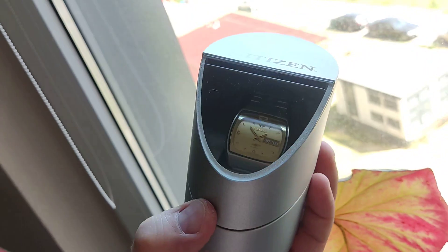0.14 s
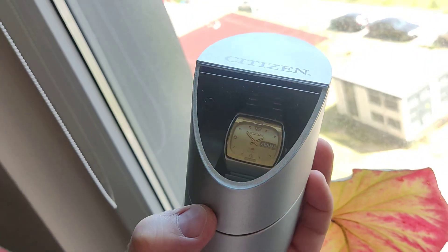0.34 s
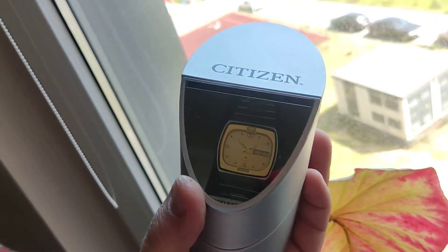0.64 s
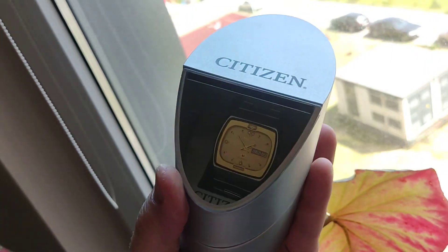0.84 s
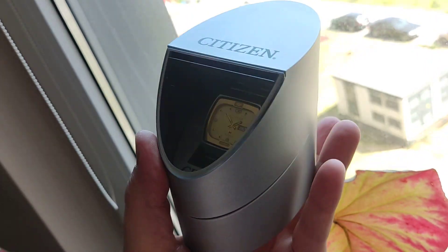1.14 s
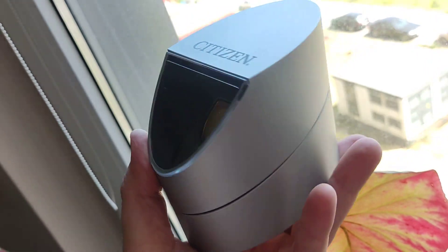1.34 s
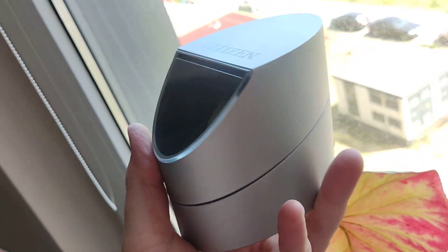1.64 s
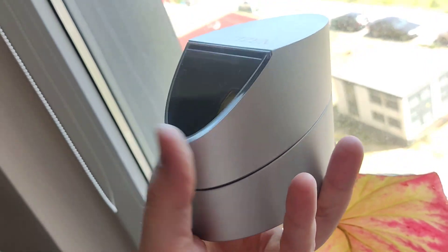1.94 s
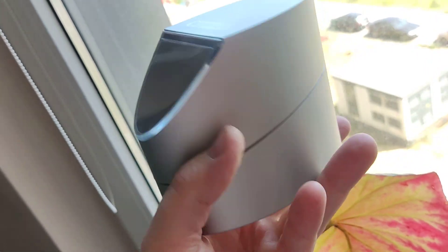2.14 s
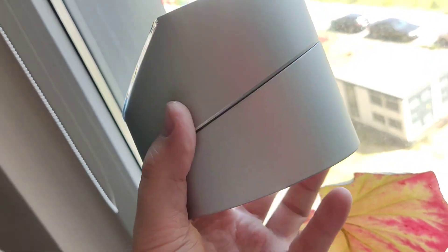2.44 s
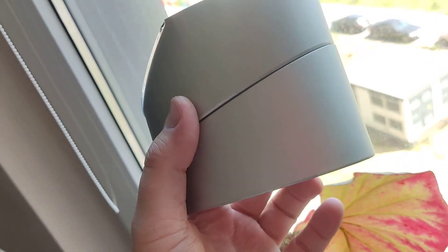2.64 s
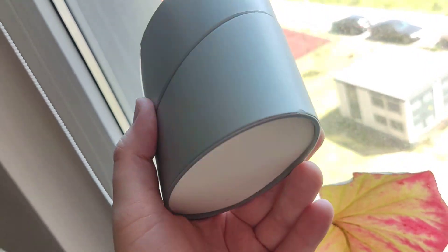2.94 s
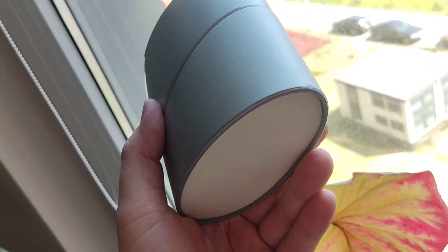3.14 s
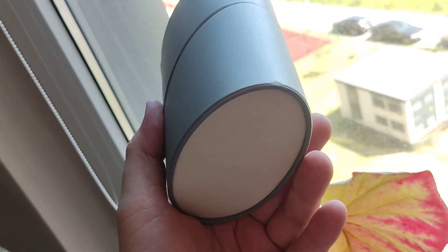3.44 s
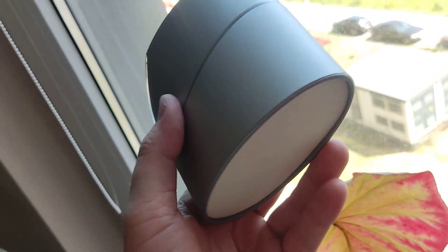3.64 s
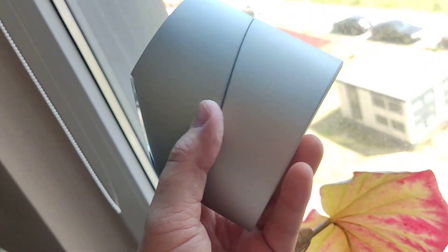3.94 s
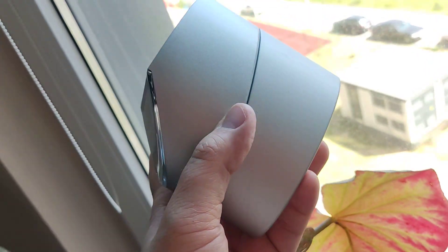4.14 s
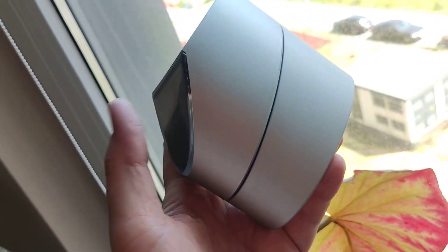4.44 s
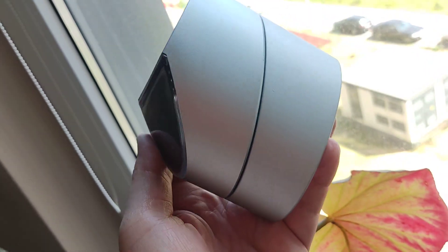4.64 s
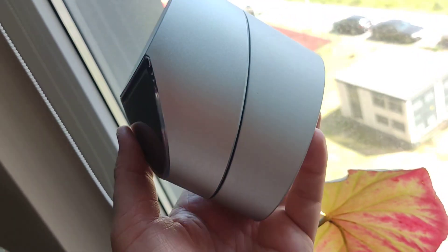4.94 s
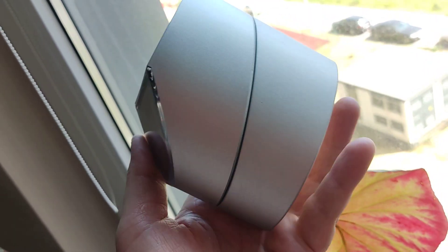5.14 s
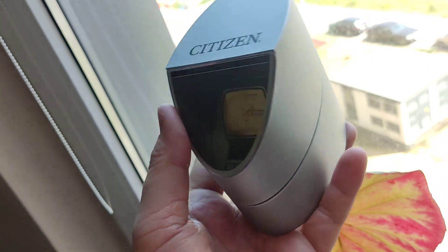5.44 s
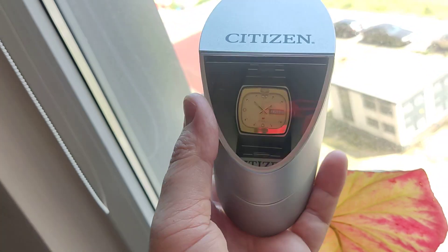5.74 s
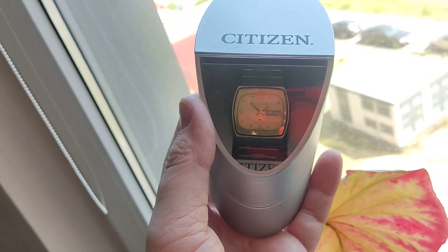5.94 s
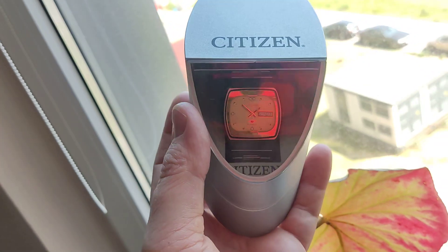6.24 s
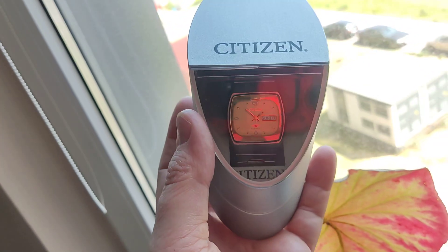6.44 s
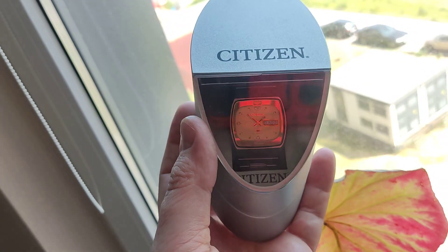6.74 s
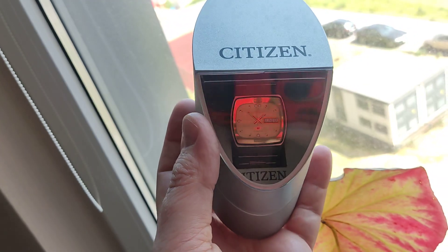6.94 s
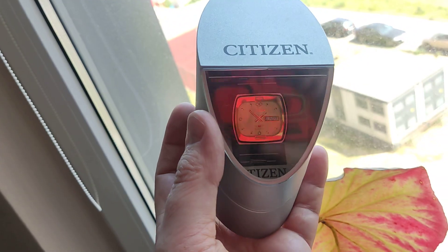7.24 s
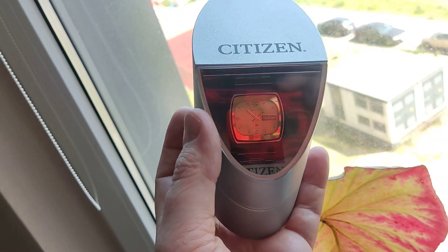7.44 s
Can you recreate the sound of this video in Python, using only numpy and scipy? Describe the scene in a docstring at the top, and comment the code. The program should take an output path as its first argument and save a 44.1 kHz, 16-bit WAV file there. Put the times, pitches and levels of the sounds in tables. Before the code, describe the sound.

Crisp, quick clockwork ticking in a quiet room, short dry finger scuffs on metal, a loud click near 2.7 seconds, and a final low thump.

```python
"""A hand turns a metal watch box by a window: fingertips slide over its matt wall, strokes of grainy noise,
and runs of stick and slip snap on the wall and in the lid's seam, one of them clearly the loudest.
A clockwork escapement, slightly out of beat, strikes ringing modes about three times a second in a small room.
Dull knocks and low bumps near the box are filtered noise; mains hum, a quiet rumble and hiss lie underneath.
Two microphone ports, a hand apart, each ring in the treble."""
import sys
import numpy as np
from scipy import signal
from scipy.fft import rfft, irfft, next_fast_len
from scipy.io import wavfile
from scipy.ndimage import map_coordinates

SR = 44100
rng = np.random.default_rng(int(sys.argv[2]) if len(sys.argv) > 2 else 0)


def wav_record(signal):
    """Record a signal, one row per channel, as 16-bit PCM in the file named by sys.argv[1]."""
    frames = np.transpose(np.atleast_2d(signal))
    bounded = np.clip(frames, -1, 1)
    # unit amplitude maps onto the largest positive 16-bit level
    quanta = np.round(bounded * 32767).astype(np.int16)
    wavfile.write(sys.argv[1], SR, quanta)


N = 334713

# All levels below hold ahead of the microphone; pan_db is left over right.
# Room air and microphone hiss, gain on white noise: pitch_hz, level_db, pan_db
AIR_COLOUR = [(12, -22, 2.5), (30.4, -34, -13.5), (68, -40.5, -11), (157, -40.5, 7), (221, -49.5, -17),
              (246, -42, 6), (327, -48, -5), (456, -52, -3), (1080, -55.5, 1.5), (1615, -51.5, 5.5),
              (3280, -60, 0.5), (4960, -64.5, 0), (8600, -63.5, 1.5), (14400, -69, 0)]
# Left-right likeness of the room air: pitch_hz, likeness (0-1, clipped)
AIR_LIKENESS = [(30, 0.19), (200, 1), (450, 0.49), (900, 0.14), (3000, 0)]
# Mains hum: harmonic (multiple of MAINS_HZ), level_db, pan_db
HUM_HARMONICS = [(1, -60, 4.5), (2, -52.5, 1), (3, -71.5, -5), (4, -70, 9), (5, -66.5, 2.5),
                 (6, -68.5, -1.5), (7, -74, 8.5), (8, -75.5, -5), (9, -93.5, 31), (12, -78, 9),
                 (28, -80, 10), (33, -85, 2)]
MAINS_HZ = 50

# Colour of friction on the metal wall, gain on white noise: pitch_hz, level_db, pan_db
WALL_COLOUR = [(400, -14.5, -9), (920, -16, 9), (1670, -7.5, 3.5), (2720, -6, 11), (3300, -8.5, 5),
               (4180, -6, 7), (5240, -9, 0.5), (7400, -2.5, 3), (9230, 2, 9.5), (10560, 0.5, 11),
               (12860, -3, 7), (15200, -15.5, 8)]
# Faint creep of the gripping fingers, before wall colour and unevenness: time_s, level_db
CREEP_LEVEL = [(0, -70), (1.2, -70.5), (2.4, -67), (3.4, -68), (4.8, -73), (5.9, -78), (7.5, -80)]
CREEP_PRESSURE_DB, CREEP_UNEVEN_DB, CREEP_CHANGES_PER_S = 7.5, 7, 9.6
# Finger strokes, level before wall colour: start_s, length_s, level_db, pressure_db (extra low body)
FINGER_STROKES = [(0.112, 0.018, -48, 3), (0.354, .015, -56.5, 11), (0.472, 0.042, -40, 1.5),
                  (0.623, 0.05, -41.5, -0.5), (.78, 0.0075, -44.5, 2), (0.845, 0.064, -54, 3.5),
                  (1.057, .22, -56, 7), (1.575, 0.0066, -48, 4), (1.937, 0.011, -50, 1),
                  (2.112, 0.032, -53, 2.5), (2.3, 0.087, -49, 8.5), (2.507, 0.029, -47.5, -1),
                  (2.685, .04, -43.5, 1), (2.776, 0.11, -47, 3.5), (3.099, 0.019, -42.5, 2.5),
                  (3.738, 0.067, -44.5, 2.5), (3.932, 0.056, -55, 7.5), (4.083, 0.073, -46.5, 5),
                  (4.217, 0.078, -46.5, 6), (4.582, 0.046, -52.5, 4), (4.987, .13, -51.5, 9),
                  (5.49, 0.083, -63.5, 11), (6.463, .15, -65, 10.5)]
# Fades of a stroke of typical length, longer ones fade more slowly; the finger speeds up on its way
STROKE_TYPICAL_S, STROKE_ATTACK_S, STROKE_RELEASE_S, STROKE_SWELL_DB = 0.039, 0.022, 0.027, 1.5

# Clockwork resonances, excited differently by the two pallets; levels are energy spread over 30 ms,
# before the change with distance: pitch_hz, width_hz, tick_db, tock_db, pan_db
CLOCK_MODES = [(850, 340, -64, -66, 0.5), (1706, 154, -57, -61, 8.5), (1962, 82, -57, -61.5, 9),
               (2372, 57, -62, -62.5, 0), (2385, 100, -62, -61.5, 15.5), (2575, 58, -79, -64.5, 17.5),
               (4030, 180, -65.5, -64, 6.5), (4840, 76, -65, -70.5, 4), (5610, 210, -67, -63.5, 3.5),
               (7800, 770, -68.5, -60.5, 17), (8220, 870, -105, -61.5, 1), (9500, 4800, -61, -64.5, 6)]
# Slow change in loudness of the beats as their distance to the microphones changes: time_s, level_db
BEAT_LEVEL = [(0, 1), (2.5, 0.6), (4.1, -2), (4.8, 0.5), (7.5, -1)]
STEEL_HZ = 2282
# The tock's lag behind its tick slowly grows
FIRST_TICK_S, TICK_PERIOD_S, TOCK_LAG_S, LAG_GROWTH_S_PER_TICK = .0838, .64367, .2705, .00079

# Snaps of the lid in its seam and of skin on the wall, before wall colour: start_s, level_db, build_s
WALL_SNAPS = [(.3405, -50, .004), (1.0761, -36, 0.00039), (1.56, -43.5, 0.0058), (1.7358, -38.5, .005),
              (2.035, -51, 0.0017), (2.226, -46.5, 0.012), (2.65, -31, 0.013), (2.797, -51, .006),
              (3.091, -42, .002)]
# A snap grows to its peak and dies in a time proportional to its build-up
SNAP_GROWTH_DB, SNAP_DECAY_PER_BUILD, SLIP_GAP_S, SLIP_DECAY_S = 2.5, 1.67, .0021, 0.0018
# Soft dull knocks and low bumps near the box, one a longer rumble, one the lid's thud:
# start_s, pitch_hz, level_db (over one decay_s), decay_s
DULL_KNOCKS = [(0.928, 158, -60.5, 0.16), (1.385, 885, -64, 0.045), (2.29, 706, -63.5, 0.09),
               (2.6503, 686, -49.5, 0.0027), (2.956, 1140, -62.5, 0.028), (6.685, 1140, -64.5, .03),
               (6.885, 910, -64, 0.019), (7.4817, 298, -53.5, 0.0048), (7.484, 182, -44, 0.009)]
# A knock's width: a share of its pitch, and more the shorter it is (Hz times s)
KNOCK_WIDTH_SHARE, KNOCK_WIDTH_HZ_S = 0.2, 0.76

# Microphone ports, left then right: pitch_hz, width_hz, peak_db
MICROPHONE_PORTS = [(10040, 990, 8), (8540, 1170, 11.5)]
CUTOFF_HZ = 14350


def from_db(db):
    """Decibels to gain."""
    return 10 ** (np.asarray(db) / 20)


def rms_one(x):
    """Each channel scaled to rms 1."""
    return x / np.sqrt(np.mean(x ** 2, axis=-1, keepdims=True) + 1e-20)


def panned(pan_db):
    """Left and right gains for a level difference."""
    return from_db(np.array([[.5], [-.5]]) * pan_db)


def on_bins(table):
    """The columns of a spectrum table at every FFT bin, joined on a log axis."""
    hz, *columns = np.transpose(table)
    bins = np.log(np.maximum(np.fft.rfftfreq(next_fast_len(N), 1 / SR), 1))
    return [np.interp(bins, np.log(hz), column) for column in columns]


def resonate(x, hz, width_hz):
    """A two-pole resonance with gain 1 on top."""
    r = np.exp(-np.pi * width_hz / SR)
    top = np.array([1, 0, -1]) * (1 - r * r) / 2
    return signal.lfilter(top, [1, -2 * r * np.cos(2 * np.pi * hz / SR), r * r], x)


def flutter(per_s):
    """Random drift about 0: so many new normal values a second, joined by straight lines."""
    at = np.arange(N) / SR * per_s
    return np.interp(at, np.arange(N // 10), rng.standard_normal(N // 10))


def stereo_noise(colour, likeness, lag_s):
    """Coloured noise: a shared part that reaches the right port later, plus each port's own part."""
    level_db, pan_db = on_bins(colour)
    size = next_fast_len(N)
    shared, *own = rfft(rng.standard_normal((3, size)))
    port_lag_s = lag_s * np.array([[0], [1]])
    delay = np.exp(-2j * np.pi * np.fft.rfftfreq(size, 1 / SR) * port_lag_s)
    alike = np.clip(likeness, 0, 1)
    both = np.sqrt(alike) * shared * delay + np.sqrt(1 - alike) * np.array(own)
    return irfft(both * from_db(level_db) * panned(pan_db), size)[:, :N]


def room_air():
    """Rumble and hiss as steady noise, whose likeness at the two ports depends on pitch."""
    return stereo_noise(AIR_COLOUR, on_bins(AIR_LIKENESS)[0], lag_s=0)


def hum():
    """Steady harmonics of the mains from an appliance in the room."""
    turn = 2 * np.pi * MAINS_HZ * np.arange(N) / SR
    out = np.zeros((2, N))
    for harmonic, level_db, pan_db in HUM_HARMONICS:
        sine = np.sqrt(2) * np.sin(round(harmonic) * turn + 2 * np.pi * rng.random())   # rms 1
        out += from_db(level_db) * panned(pan_db) * sine
    return out


def rubbing(grain_db=2.5, grains_per_s=2200, judder_db=2.23, judders_per_s=110, body_hz=6500, likeness=0.41):
    """Skin catches on the matt metal in tiny grains; strokes swell and fade, and pressure brings out the body."""
    t = np.arange(N)[::20] / SR   # coarse steps are enough for power
    uneven_db = CREEP_UNEVEN_DB * flutter(CREEP_CHANGES_PER_S)[::20]
    light = from_db(np.interp(t, *np.transpose(CREEP_LEVEL)) + uneven_db) ** 2
    pressed = light * from_db(CREEP_PRESSURE_DB) ** 2
    for start_s, length_s, level_db, pressure_db in FINGER_STROKES:
        power = (from_db(level_db) * stroke_envelope(t - start_s, length_s)) ** 2
        light += power
        pressed += power * from_db(pressure_db) ** 2
    light, pressed = [np.interp(np.arange(N) / SR, t, power) for power in (light, pressed)]
    roughness_db = grain_db * flutter(grains_per_s) + judder_db * flutter(judders_per_s)
    grain = rms_one(catches() * from_db(roughness_db))
    friction = stereo_noise(WALL_COLOUR, likeness, lag_s=0.000494) * grain   # the box is nearer the left port
    body = signal.sosfiltfilt(signal.butter(3, body_hz, fs=SR, output="sos"), friction)
    return body * np.sqrt(pressed) + (friction - body) * np.sqrt(light)


def stroke_envelope(t, length_s, steepness=1.3):
    """Attack, a hold that swells a little, release; t counts from the start of the hold."""
    slowness = np.sqrt(length_s / STROKE_TYPICAL_S)
    outside = np.maximum(-t, 0) / STROKE_ATTACK_S + np.maximum(t - length_s, 0) / STROKE_RELEASE_S
    swell = from_db(STROKE_SWELL_DB * (np.clip(t / length_s, 0, 1) - .5))
    return swell * np.exp(-np.minimum((outside / slowness) ** steepness, 20))


def catches(per_s=70, catch_db=0.0, decay_s=0.00074):
    """Now and then a ridge of the skin sticks and lets go: a brief surge of the friction."""
    slips = (rng.random(N) < per_s / SR) * rng.random(N)
    surge = signal.lfilter([1], [1, -np.exp(-1 / (decay_s * SR))], slips + 1e-18)
    return 1 + from_db(catch_db) * surge


def near_echoes(x, echo_db, sway_s=.00003, count=5):
    """Window, sill and hand return the sound within milliseconds; the ripple they cut shifts as the box moves."""
    out, size = x.copy(), 4
    for side in range(2):
        fine = signal.resample_poly(x[side], size, 1)   # finer steps keep the echoes bright
        for delay_s in rng.uniform(.0015, .007, count):
            read = size * (np.arange(N) - SR * (delay_s + sway_s * flutter(3.6)))
            out[side] += from_db(echo_db) * map_coordinates(fine, [read], order=1)
    return out / np.sqrt(1 + count * from_db(echo_db) ** 2)


def escapement(change=1.0, skirt=0.63):
    """Each beat rings the same modes by noise that is part shared by all beats, part its own, as room paths."""
    t = np.arange(SR // 4) / SR
    times = beat_times()
    own_paths = rng.standard_normal((len(times), 2, len(t)))
    paths = rng.standard_normal((2, len(t))) + change * own_paths
    is_tock = np.arange(len(times))[:, None, None] % 2
    spread = np.sqrt(.03 / t[-1])   # energy over 30 ms
    beats = strike(t, paths)
    for hz, width_hz, tick_db, tock_db, pan_db in CLOCK_MODES:
        mode = resonate(paths * beat_envelope(t, hz), hz, width_hz)
        ring = resonate(mode, hz, min(skirt * width_hz + 500, SR / 4))
        level = from_db(np.where(is_tock, tock_db, tick_db))
        beats = beats + spread * rms_one(ring) * level * panned(pan_db)
    out = np.zeros((2, N + len(t)))
    for start_s, beat in zip(times, beats):
        start = round(start_s * SR)
        out[:, start:start + len(t)] += from_db(np.interp(start_s, *np.transpose(BEAT_LEVEL))) * beat
    return out[:, :N]


def beat_times(count=12):
    """Ticks and tocks in turn, each tock lagging its tick a little more than the last."""
    k = np.arange(count)
    ticks = FIRST_TICK_S + TICK_PERIOD_S * k
    tocks = ticks + TOCK_LAG_S + LAG_GROWTH_S_PER_TICK * k
    return np.column_stack([ticks, tocks]).ravel()


def strike(t, paths, snap_db=-51, snap_s=0.001, snap_hz=4600, snap_width_hz=3000,
           ring_db=-48.0, ring_s=0.029, swell_s=0.0013, pan_db=7):
    """A pallet hits a tooth: a broad snap, and one clean steel ring that the case takes a moment to pick up."""
    snap = from_db(snap_db) * resonate(paths * np.exp(-t / snap_s), snap_hz, snap_width_hz)
    arrival_s = np.array([[0], [.0001]])   # later phase at the right port
    envelope = np.exp(-t / ring_s) * (1 - np.exp(-t / swell_s))
    ring = from_db(ring_db) * np.sin(2 * np.pi * STEEL_HZ * (t - arrival_s)) * envelope
    return (snap + ring) * panned(pan_db)


def beat_envelope(t, hz, crack_cycles=16, room_db=-5, room_s=0.048, dry_db_per_octave=-3.0,
                  echo_s=0.022, echo_db=-8):
    """A crack that is shorter in the treble, one wall echo and the room's tail."""
    crack_s = np.clip(crack_cycles / hz, .003, .01)
    crack = np.exp(-t / crack_s)
    echo = from_db(echo_db) * (t > echo_s) * np.exp(-np.abs(t - echo_s) / crack_s)
    tail_db = room_db + dry_db_per_octave * np.log2(hz / 2000)
    tail = from_db(tail_db) * np.exp(-t / room_s)
    return np.sqrt(crack ** 2 + echo ** 2 + tail ** 2)


def snaps(room_db=-19, room_s=0.039, room_fill_s=0.0035, likeness=0.61):
    """Each snap is a gritty run of slips on the wall, damped by the hand, with a faint room tail."""
    t = np.arange(SR // 3) / SR
    power = np.zeros(N + len(t))
    for start_s, level_db, build_s in WALL_SNAPS:
        growth = from_db(SNAP_GROWTH_DB * np.minimum(t / build_s - 1, 0))
        past_peak = np.maximum(t - build_s, 0) / (SNAP_DECAY_PER_BUILD * build_s)
        fade = np.exp(-np.minimum(past_peak, 20))
        fill = build_s / room_fill_s   # longer snaps feed the room more
        tail = from_db(room_db) ** 2 * np.exp(-2 * t / room_s) * fill
        start = round(start_s * SR)
        power[start:start + len(t)] += from_db(level_db) ** 2 * ((growth * fade * slip_run(t)) ** 2 + tail)
    return np.sqrt(power[:N]) * stereo_noise(WALL_COLOUR, likeness, lag_s=0.000234)


def slip_run(t, count=400):
    """Stick and slip: sharp jolts at uneven gaps, each dying at once; rms 1."""
    starts = np.append(0, np.cumsum(SLIP_GAP_S * (.5 + rng.random(count))))
    since = t - starts[np.searchsorted(starts, t, "right") - 1]
    return rms_one(np.exp(-since / SLIP_DECAY_S))


def knocks(pan_db=3.5):
    """Soft dull knocks and low bumps near the box: decaying noise through two resonances."""
    t = np.arange(SR) / SR
    out = np.zeros((2, N + len(t)))
    for start_s, hz, level_db, decay_s in DULL_KNOCKS:
        width_hz = KNOCK_WIDTH_SHARE * hz + KNOCK_WIDTH_HZ_S / decay_s
        push = rng.standard_normal(len(t)) * np.exp(-t / decay_s)
        ring = resonate(resonate(push, hz, width_hz), hz, 2 * width_hz)
        knock = rms_one(ring) * np.sqrt(decay_s / t[-1])
        start = round(start_s * SR)
        out[:, start:start + len(t)] += from_db(level_db) * knock * panned(pan_db)
    return out[:, :N]


def scene():
    """The clockwork and the handled box over the quiet room."""
    background = room_air() + hum()
    box = near_echoes(rubbing(), echo_db=-6.5) + near_echoes(snaps(), echo_db=-4.5, count=2)
    return background + box + escapement() + knocks()


def record(dry):
    """Each microphone port adds its own treble resonance; the top is cut steeply."""
    heard = []
    for x, (hz, width_hz, peak_db) in zip(dry, MICROPHONE_PORTS):
        heard.append(x + (from_db(peak_db) - 1) * resonate(x, hz, width_hz))
    return signal.sosfilt(signal.ellip(12, .1, 80, CUTOFF_HZ, fs=SR, output="sos"), heard)


dry = scene()
out = record(dry)
wav_record(out)
```